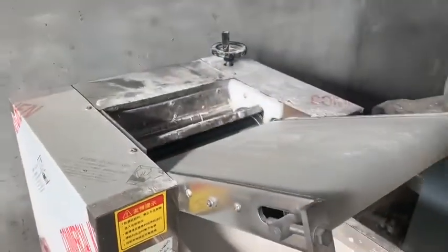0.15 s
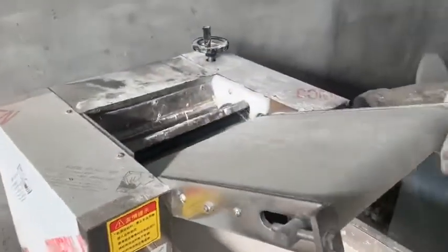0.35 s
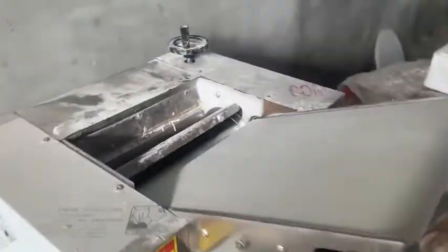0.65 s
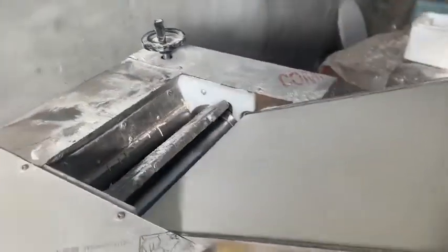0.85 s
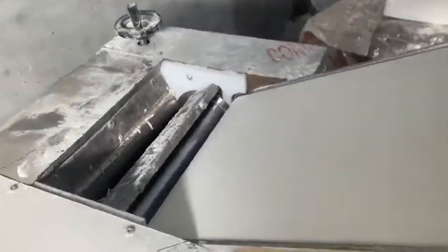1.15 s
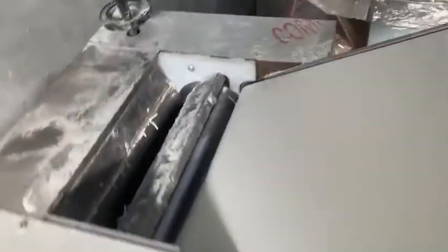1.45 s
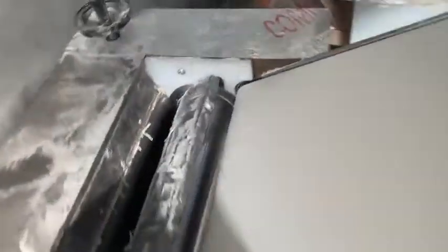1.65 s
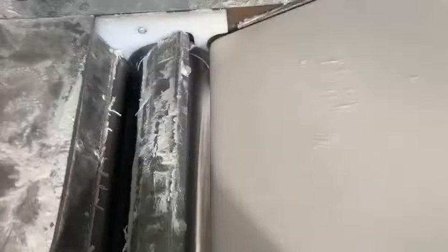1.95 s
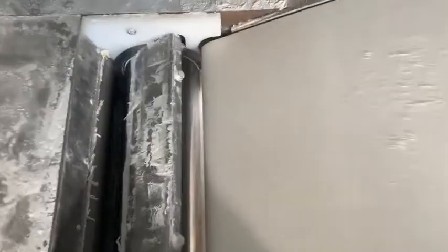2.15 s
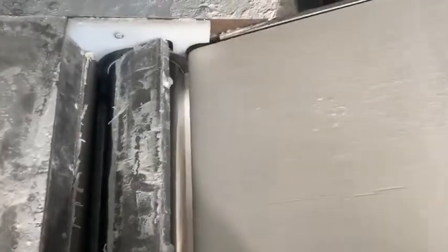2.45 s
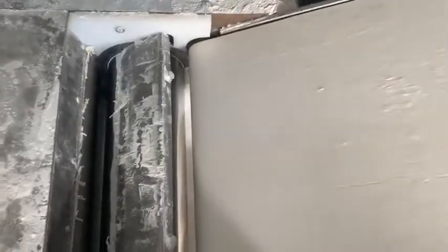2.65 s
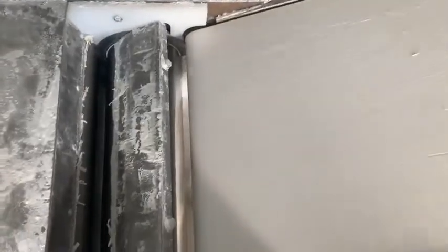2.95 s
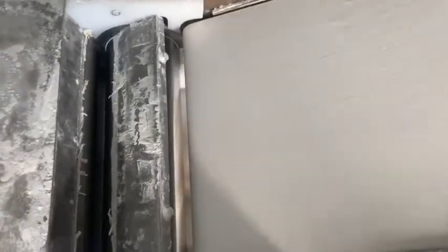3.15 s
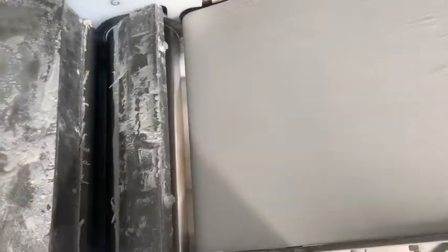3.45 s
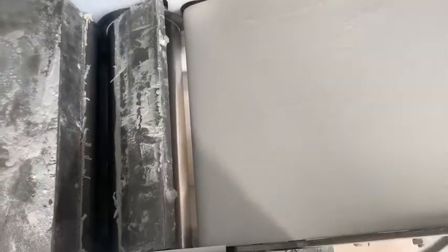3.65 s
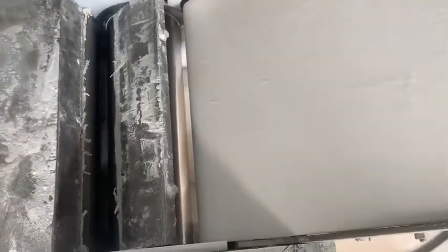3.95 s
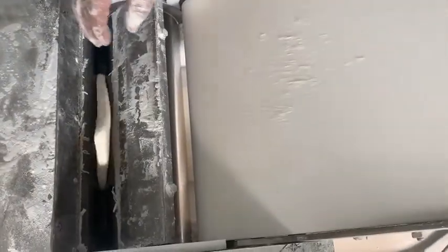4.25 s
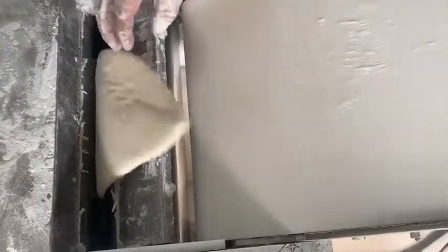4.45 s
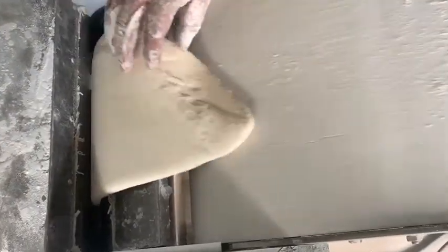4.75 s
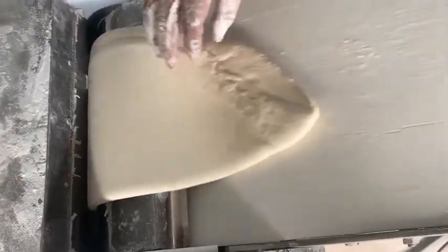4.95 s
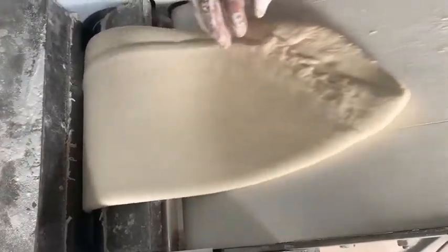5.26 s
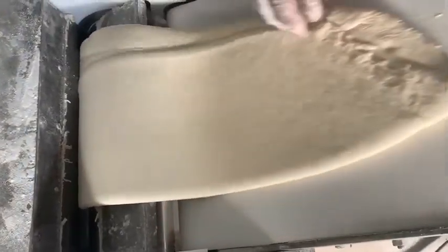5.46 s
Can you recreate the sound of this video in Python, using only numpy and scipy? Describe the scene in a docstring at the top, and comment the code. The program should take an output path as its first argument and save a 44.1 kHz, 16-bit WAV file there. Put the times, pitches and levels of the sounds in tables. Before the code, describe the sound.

In a bare, echoing workshop, an electric dough roller runs continuously, with a low rumbling frame, a wavering mid-high gear whine and rattling chain. At the start a piece of steel drops further off, bouncing with bright clatter and ringing. The handheld stereo microphone moves closer, so the whine dips, shifts between sides, then grows strong and steady. Dough finally enters, adding a faint strained tone and harder chain surges.

```python
"""A bare workshop: an electric dough roller runs while a hand-held stereo phone moves in over it.
Close by, the gears whine as a wavering sine, and noise-driven resonances make the frame rumble.
The drive chain chatters tooth by tooth, surging once a turn; dough brings on a strain tone later.
Further off an earlier hit on steel dies away, then a piece is dropped: its bounces ring its modes
and clatter into the room."""
import sys
import numpy as np
from scipy import signal
from scipy.fft import rfft, irfft
from scipy.io import wavfile
from scipy.ndimage import uniform_filter1d

SR = 44100
rng = np.random.default_rng(int(sys.argv[2]) if len(sys.argv) > 2 else 0)


def master_out(mix):
    """Clip the mix to full scale and print it as 16-bit PCM to the path in sys.argv[1]."""
    frames = np.transpose(np.atleast_2d(mix))
    ceiling = np.clip(frames, -1, 1)
    pcm = np.round(ceiling * 32767).astype(np.int16)
    wavfile.write(sys.argv[1], SR, pcm)


def linear_from_db(decibels):
    """Turn decibels (scalar or array-like) into linear amplitude factors; 0 gives 1."""
    return 10 ** (np.asarray(decibels, float) / 20)


N = 247842
T = np.arange(N) / SR
HZ = np.fft.rfftfreq(N, 1 / SR)


def level(x, db):
    """Scale to an rms level."""
    return x * linear_from_db(db) / np.sqrt(np.mean(x ** 2))


def curves(table):
    """Columns of a table, joined by straight lines in time."""
    s, *columns = np.transpose(table)
    return [np.interp(T, s, c) for c in columns]


def spectrum(table):
    """Gain for each frequency bin, joined in dB along log frequency."""
    hz, db = np.transpose(table)
    return linear_from_db(np.interp(np.log(HZ + 1), np.log(hz), db))


def ring(x, hz, width):
    """A two-pole resonance, width in Hz, whose ring starts at size 1."""
    r, w = np.exp(-np.pi * width / SR), 2 * np.pi * hz / SR
    return signal.lfilter([0, np.sin(w)], [1, -2 * r * np.cos(w), r * r], x)


def ring_width(t60):
    """Width in Hz of a resonance that falls 60 dB in t60 seconds."""
    return np.log(1000) / np.pi / t60


def blows(s, db):
    """Impulses at given times."""
    out = np.zeros(N)
    index = np.clip((np.asarray(s) * SR).astype(int), 0, N - 1)
    np.add.at(out, index, linear_from_db(db))
    return out


def contact(x, seconds):
    """Spread each blow into a short scrape of noise that dies away."""
    decay = np.exp(-1 / (seconds * SR))
    return signal.lfilter([1], [1, -decay], x) * rng.standard_normal(N)


def walk(rate):
    """Random levels of spread near 1, a new one each 1 / rate s, joined by straight glides."""
    k = int(SR / rate)
    held = np.repeat(rng.standard_normal(N // k + 1), k)
    return uniform_filter1d(held, k)[:N]


def bump(s, spread):
    """A smooth rise and fall around a moment."""
    return np.exp(-.5 * ((T - s) / spread) ** 2)


def room(x, wet_db, t60_scale):
    """Shared direct sound plus two unrelated one-second tails whose treble dies first."""
    bass_t60, treble_t60 = 1.48 * t60_scale, 0.05 * t60_scale  # seconds
    t = T[:SR]
    noise = rng.standard_normal((2, SR))
    dull = signal.lfilter([.35], [1, -.65], noise)
    fall = -np.log(1000) * t
    tail = dull * np.exp(fall / bass_t60) + (noise - dull) * np.exp(fall / treble_t60)
    tail = tail * linear_from_db(wet_db) / np.sqrt(np.sum(tail ** 2) / 2)
    tail[:, 0] = 1  # the direct sound
    return signal.fftconvolve(x[None], tail, axes=1)[:, :N]


def load():
    """Share of the rollers filled with dough, 0-1; it enters at 4.1 s and fills them by 4.3 s."""
    return np.interp(T, [4.1, 4.3], [0, 1])


WHINE_HZ, LOADED_SAG_HZ = 895.4, 2.7  # the motor slows a little under load


def mesh_cycles():
    """Gear mesh cycles gone by."""
    return np.cumsum(WHINE_HZ - LOADED_SAG_HZ * load()) / SR


# Gear whine at the hand-held phone as it passes through standing waves.
# Each row: time in seconds, level in dB, left minus right in dB.
WHINE_PATH = [(0, -29, -2), (.19, -34.5, 2.5), (.3, -48, 0), (.58, -51, 17), (.68, -33.5, 9), (.85, -38, 0),
              (1.1, -33.5, 3), (1.2, -38, 3), (1.3, -57, 0), (1.45, -47, 18), (1.62, -36.5, 18.5),
              (2.05, -24.5, 2), (2.7, -23.5, 1.5), (4.3, -27, 2.5), (5.62, -27, 3)]


def whine():
    """Gear mesh tone; standing waves move it between left and right as the phone travels."""
    db, pan_db = curves(WHINE_PATH)
    phase = 2 * np.pi * mesh_cycles() + .12 * walk(30)
    lag = np.array([[-.22], [.22]])  # radians, left and right
    side_db = db + 1.24 * walk(18) + 0.97 * walk(4.83) + np.array([pan_db, -pan_db]) / 2
    return np.sqrt(2) * linear_from_db(side_db) * np.sin(phase + lag)


# The phone's closeness to the machine, heard in the rumble.
# Each row: time in seconds, level in dB (relative).
CLOSENESS = [(0, -29), (.4, -24.5), (.8, -26.5), (1.3, -25), (1.7, -22.5), (3.8, -23), (4.3, -23.5),
             (5.3, -22.5), (5.62, -22.5)]
# Frame resonances shaken by the motor.
# Each row: frequency in Hz, width in Hz, level in dB (relative).
FRAME_MODES = [(67.7, 6.7, -9), (78, 16, -2.5), (99.1, 4.9, 0), (129.8, 1.6, -5.5), (151.6, 6.8, -8),
               (175.5, 27, -8.5), (240.3, 26, 0), (327.7, 70, -1.5), (443.7, 11.6, -12.5)]
# Running noise of motor, rollers and belt.
# Each row: frequency in Hz, density in dB per Hz (relative).
RUNNING_NOISE = [(30, -6), (45, -47), (60, -2.5), (160, -7.5), (280, -2.5), (420, -13), (800, -1.5),
                 (1300, -10), (1600, -19.5), (2600, -18), (4000, -22.5), (5000, -26.5), (6500, -28),
                 (9000, -28.5), (11500, -28), (11700, -32), (11850, -47)]


def body():
    """Noise-shaken frame resonances and broad running noise, each flickering a little."""
    closeness_db, = curves(CLOSENESS)
    frame = 0
    for hz, width, db in FRAME_MODES:
        mode = level(ring(rng.standard_normal((2, N)), hz, width), db)
        frame = frame + mode * linear_from_db(2.5 * walk(3.73))
    noise = irfft(rfft(rng.standard_normal((2, N))) * spectrum(RUNNING_NOISE), N)
    low = signal.sosfilt(signal.butter(2, 500, fs=SR, output="sos"), noise)
    middle = signal.sosfilt(signal.butter(1, 2800, fs=SR, output="sos"), noise - low)
    treble = noise - low - middle
    high = middle * linear_from_db(1.77 * walk(25)) + treble * linear_from_db(1.87 * walk(25))
    high = high * linear_from_db(1.0 * walk(11))
    return linear_from_db(closeness_db) * (level(frame, -0.47) + level(low, -3.0) + level(high, -3.22))


# Faint thin tones of the motor, wavering in pitch and level.
# Each row: frequency in Hz, level in dB rms (both before wavering; level before the phone).
MOTOR_TONES = [(130, -36.5), (1740, -52.5), (2794, -49.5), (11370, -76)]


def tones():
    """Thin motor tones, wavering in pitch and level."""
    out = 0
    for hz, db in MOTOR_TONES:
        cycles = np.cumsum(hz + 0.00191 * hz * walk(9.2)) / SR
        out = out + linear_from_db(db + 2.0 * walk(7.5)) * np.sin(2 * np.pi * cycles)
    return two_hearings(out)


def two_hearings(tone):
    """A tone and a copy a seventh of a second later, wrapped round, scaled from rms to peak."""
    return np.sqrt(2) * np.array([tone, np.roll(tone, SR // 7)])


def teeth_passed():
    """Chain teeth gone by, geared at 15.86 whine cycles to a tooth."""
    return mesh_cycles() / 15.86


# Pull of the chain on the frame.
# Each row: multiple of the tooth rate, level in dB (relative), extra dB under load.
CHAIN_PULL = [(1, -32.5, 0), (2, -34, 5), (4, -30.5, 1.5)]
# Brief swells of the hum.
# Each row: time in seconds, multiple of the tooth rate, spread in seconds, extra dB.
HUM_SWELLS = [(1.17, 4, 0.017, 12), (1.68, 2, 0.16, 6), (1.75, 4, 0.036, 6), (2.2, 4, 0.025, 11),
              (2.9, 2, 0.13, 12.5), (3.42, 4, 0.035, 8.5), (3.75, 2, 0.18, 9.5), (3.85, 4, 0.051, 6.5),
              (4.12, 4, 0.021, 14.5), (4.97, 2, 0.13, 8.5), (5.4, 4, 0.13, 10), (5.5, 2, 0.23, 3.5)]


def pull():
    """The uneven pull of the chain shakes the frame at multiples of the tooth rate."""
    out = 0
    for k, db, load_db in CHAIN_PULL:
        swell_db = sum(extra_db * bump(s, spread) for s, multiple, spread, extra_db in HUM_SWELLS
                       if round(multiple) == round(k))
        gain = linear_from_db(db + load_db * load() + swell_db + 2.1 * walk(6) + 1.95 * walk(17))
        phase = 2 * np.pi * round(k) * teeth_passed() + 0.26 * k * walk(10)
        out = out + gain * np.sin(phase)
    return out


TAUT_DB = -51  # chatter between surges, relative
REBOUND_S, REBOUND_AFTER_S = 0.023, .13  # spread in time, and lag
# Slack runs through the chain once a turn: a surge of chatter, then a rebound.
# Each row: time in seconds, spread in seconds, surge in dB, rebound in dB (both relative),
# extra dB on the low link modes, extra dB on the upper ones.
SLACK_SURGES = [(.745, 0.041, -43, -44, -9, -8), (1.04, 0.067, -43, -40, -15, 1.5),
                (1.56, 0.068, -39.5, -41.5, 4, -2.8), (2.02, 0.025, -49, -55, -8, 6),
                (2.5, 0.07, -42.5, -67, -4, 0), (2.82, 0.039, -39.5, -42, -0.5, 0.5),
                (3.28, 0.03, -42.5, -80, 5, 7), (3.65, 0.014, -40.5, -41.5, 5.5, 4),
                (4.14, 0.062, -40.5, -64, 0.5, -2), (4.531, 0.04, -36.5, -55, 1, 3.5),
                (4.9, 0.051, -37.5, -40.5, 2.5, 0.42), (5.33, 0.054, -34.5, -62, -4.5, 3.5)]
# Single sharp link knocks.
# Each row: time in seconds, level in dB (relative), brightness in dB.
LINK_KNOCKS = [(.82, -28, -8), (1.148, -29, 6.5), (1.222, -32, -10), (1.464, -38, 3), (1.589, -44, -1),
               (1.732, -26.5, -18), (2.421, -26.5, 2), (2.436, -29.5, 9), (2.489, -29, 3), (2.761, -29, -7),
               (2.932, -30, -3), (2.998, -31.5, 10.5), (4.502, -30, 7)]
# What a chain tooth rings.
# Each row: frequency in Hz, width in Hz of each of two resonances, level in dB (relative).
LINK_MODES = [(644, 320, -6.5), (1182, 314, 1), (1322, 104, -8), (1766, 150, -10), (2140, 250, -5),
              (2580, 290, -3), (3090, 500, -8), (2807, 197, -3.5), (3520, 690, -5.5), (3940, 670, -7),
              (6930, 1100, -16.5), (8670, 1400, -12), (9520, 1800, -8)]


def chain():
    """Every tooth meets the sprocket with a small rattling blow; slack makes the blows hard."""
    at = np.flatnonzero(np.diff(np.floor(teeth_passed())))
    late, strength = rng.standard_normal((2, len(at)))
    teeth = blows(at / SR + .0014 * late, 2.2 * strength)
    # links scrape all the time and strike once a tooth
    rattle = level(contact(teeth, 0.0051), 0) + linear_from_db(-6) * rng.standard_normal(N)
    low = middle = upper = linear_from_db(TAUT_DB)
    for s, spread, surge_db, rebound_db, low_db, upper_db in SLACK_SURGES:
        surge = linear_from_db(surge_db) * bump(s, spread)
        surge = surge + linear_from_db(rebound_db) * bump(s + REBOUND_AFTER_S, REBOUND_S)
        low = low + linear_from_db(low_db) * surge
        middle = middle + surge
        upper = upper + linear_from_db(upper_db) * surge
    s, db, bright_db = np.transpose(LINK_KNOCKS)
    dull_knock = contact(blows(s, db), 0.0091)
    bright_knock = contact(blows(s, db + bright_db), 0.0091)
    out = 0
    for hz, width, mode_db in LINK_MODES:
        surge = low if hz < 1500 else middle if hz < 3000 else upper
        knock = bright_knock if hz > 6000 else dull_knock
        # different links take the load, so each mode comes and goes on its own
        blow = linear_from_db(2.5 * walk(9)) * rattle * surge + knock
        # link and sprocket both ring, which steepens each resonance
        mode = ring(ring(blow, hz, width), hz, width)
        out = out + linear_from_db(mode_db) * (width / SR) ** 1.5 * mode
    return linear_from_db(28.0) * out


RATTLE_PER_S = 110  # rate of the roughness in steel rings and clinks


def pushed_ring(x, hz, t60):
    """A ring behind a quick 81 Hz wide one: the steel takes a few ms to sound."""
    push_hz = 81
    return 2 * np.pi * push_hz / SR * ring(ring(x, hz, push_hz), hz, ring_width(t60))


# Steel further off: the tail of an earlier hit, then a drop with bounces;
# the later bounces are damped by the bench.
# Each row: time in seconds, clatter in dB, ring in dB (both relative).
BOUNCES = [(0, -29, -38), (0.24, -24, -21.5), (.25, -26, -19.5), (0.266, -22.5, -18), (.3, -30, -23),
           (0.327, -27, -31), (.345, -35, -28), (0.368, -32, -33), (0.403, -33.5, -38), (0.43, -48, -28.5),
           (0.491, -31.5, -50), (.55, -50, -47)]
# Modes of the steel, in the order of the frequencies below.
# Each row: level in dB (relative), time to fall 60 dB in seconds.
STEEL_MODES = [(-11, 0.48), (-17, 0.15), (3, 0.13), (-3, 0.087), (-8.5, 0.54), (-2, 0.13), (-8, .2),
               (4.5, 0.4), (5, 0.38), (4, 0.11), (-18, 0.26), (-25, 0.22), (-27, 0.17), (-10, .12),
               (4.5, 0.069), (-8, .12), (-11, 0.11)]
# Frequencies of those modes. One column: frequency in Hz.
STEEL_MODE_HZ = [2085, 2492, 3170, 3402, 3967, 4070, 4441, 5257, 5286, 5387, 5545, 5884, 6993, 10750, 11050,
                 11320, 11880]


def steel():
    """Bounces ring the same modes with new strengths; the clatter of each bounce fills the room."""
    s, clatter_db, ring_db = np.transpose(BOUNCES)
    chance = rng.standard_normal((len(STEEL_MODES), len(s)))
    rings = 0
    for hz, (mode_db, t60), luck in zip(STEEL_MODE_HZ, STEEL_MODES, chance):
        mode = pushed_ring(blows(s, ring_db + mode_db + 1.6 * luck), hz, t60)
        # the steel rattles on the bench, which roughens its rings
        rings = rings + (1 + .9 * walk(RATTLE_PER_S)) * mode
    band = signal.butter(1, [1100, 5000], "band", fs=SR, output="sos")
    clatter = signal.sosfilt(band, contact(blows(s, clatter_db), 0.0065))
    rings = room(linear_from_db(-10.0) * rings + thud() + clinks(), -4.5, 0.89)
    return rings + linear_from_db(9.5) * linear_from_db(0.62 * walk(40.2)) * room(clatter, 5.3, 1.0)


def thud():
    """The hardest bounce sounds the bench: one short ring."""
    return pushed_ring(blows([.262], -12), 1412, 0.026)


# Small metal clinks nearby.
# Each row: time in seconds, peak in dB (before roughening and the room), frequency in Hz,
# time to fall 60 dB in seconds.
METAL_CLINKS = [(2.325, -32, 5240, 0.13), (2.49, -37, 6400, 0.2), (2.62, -43, 11350, .15),
                (2.615, -40, 6690, 0.05)]


def clinks():
    """A short rub of noise swells one rough ring for each clink."""
    out = 0
    for s, db, hz, t60 in METAL_CLINKS:
        rub = bump(s, 0.03) * rng.standard_normal(N)
        clink = ring(rub, hz, ring_width(t60))
        clink = linear_from_db(db) * clink / np.max(np.abs(clink))
        out = out + clink * (1 + 0.26 * walk(RATTLE_PER_S))
    return out


def strain():
    """A tone wavering about 591 Hz, heard as dough loads the rollers."""
    cycles = np.cumsum(591 + 14 * walk(25)) / SR
    return two_hearings(load() * linear_from_db(-37 + 2.5 * walk(12)) * np.sin(2 * np.pi * cycles))


# Stereo width band by band: how much of each band is out of step between left and right.
# Each row: frequency in Hz, side minus mid in dB.
STEREO_WIDTH = [(30, -13), (55, -18), (110, -19.5), (190, -21), (260, -21), (400, -9.5), (700, -5.5),
                (1100, -2), (1800, -1), (3600, 0), (4900, 1), (5400, 2.5), (6100, 0.5), (6900, -10),
                (7600, 8), (8000, 9), (8900, 27.5), (9600, 3.5), (10300, -15), (11000, -17)]
# Stereo balance band by band.
# Each row: frequency in Hz, left minus right in dB.
STEREO_BALANCE = [(100, -1.3), (400, 0.8), (1400, 1), (2800, 2.1), (5600, -2.2), (9000, 1.6), (11500, -2)]


def scene():
    """Near machine and far steel, spread over left and right band by band; the whine joins directly."""
    both = body() + tones() + pull() + room(chain(), -1.45, 0.12) + steel() + strain()
    ratio = spectrum(STEREO_WIDTH)
    # the out-of-step part is turned by a quarter cycle
    turn = np.array([ratio ** 0, -1j * ratio]) / np.sqrt(1 + ratio ** 2)
    mid, side = irfft(rfft(both) * turn, N)
    balance = np.sqrt(spectrum(STEREO_BALANCE))
    stereo = irfft(rfft([mid + side, mid - side]) * np.array([balance, 1 / balance]), N)
    return linear_from_db(-1.82) * stereo + whine()


def roll_off(x):
    """The treble ends steeply here."""
    return signal.sosfilt(signal.butter(12, 12310, fs=SR, output="sos"), x)


def record(dry):
    """The phone weakens the deep bass below 51 Hz and cuts the top above 11930 Hz."""
    bass_cut = signal.butter(8, 51, "high", fs=SR, output="sos")
    heard = linear_from_db(-12.5) * dry + signal.sosfilt(bass_cut, dry)
    top_cut = signal.ellip(10, .2, 70, 11930, fs=SR, output="sos")
    heard = signal.sosfilt(top_cut, heard)
    return roll_off(heard)


dry = scene()
out = record(dry)
master_out(out)
```